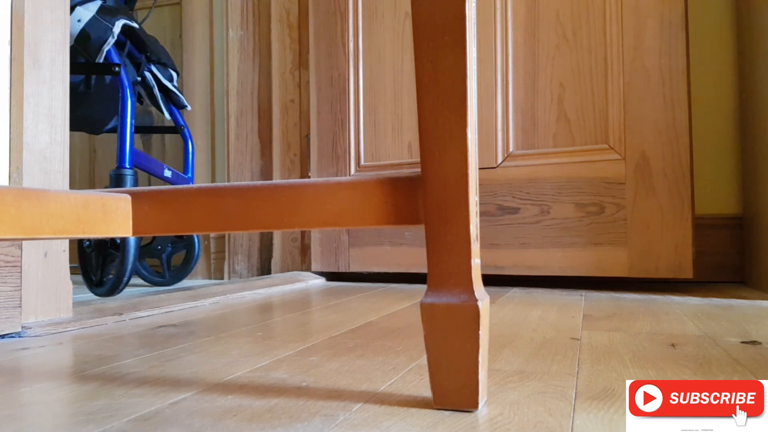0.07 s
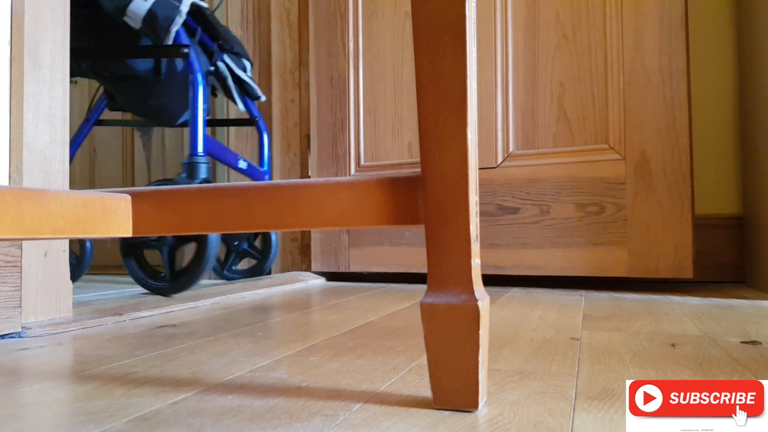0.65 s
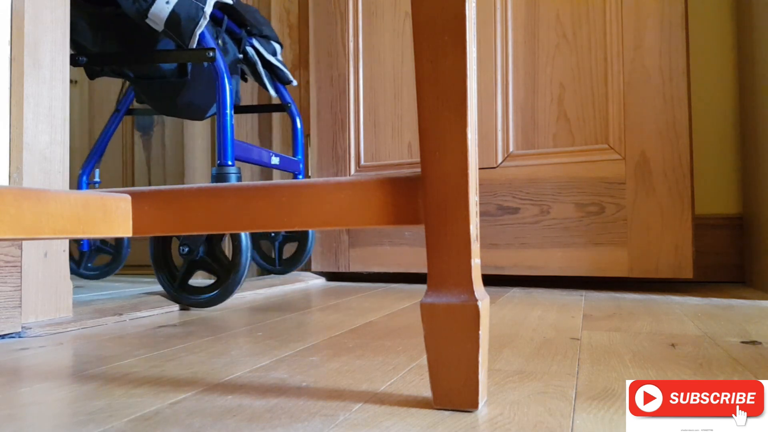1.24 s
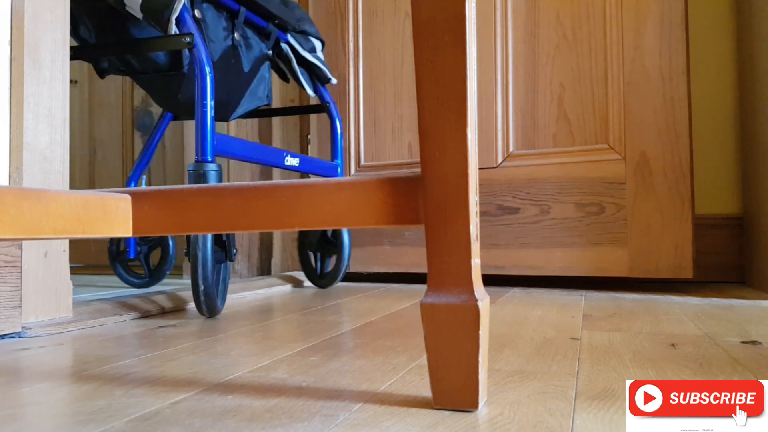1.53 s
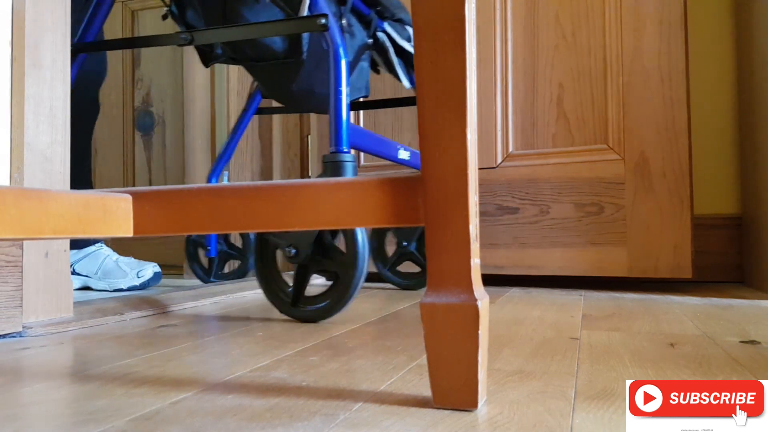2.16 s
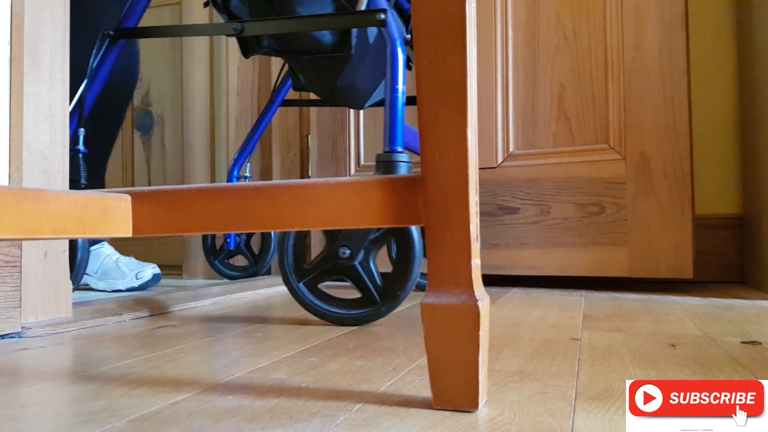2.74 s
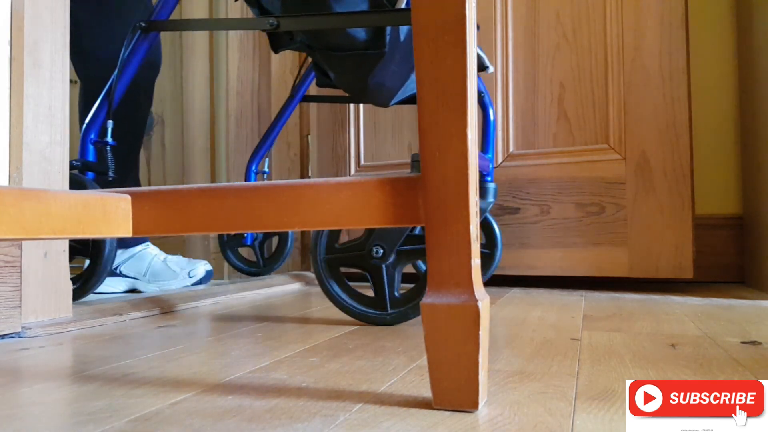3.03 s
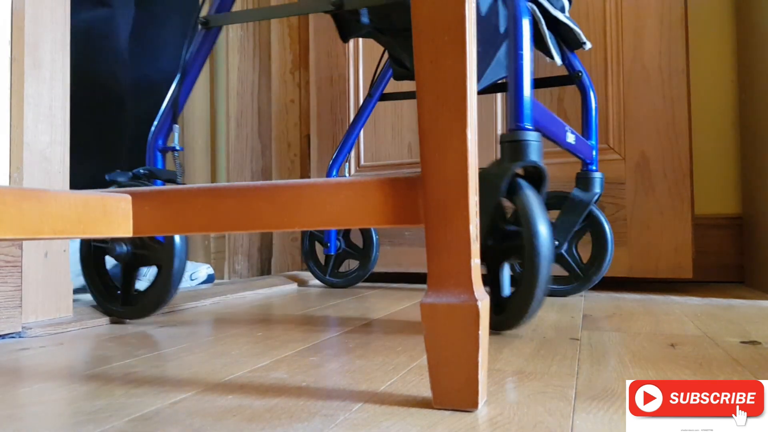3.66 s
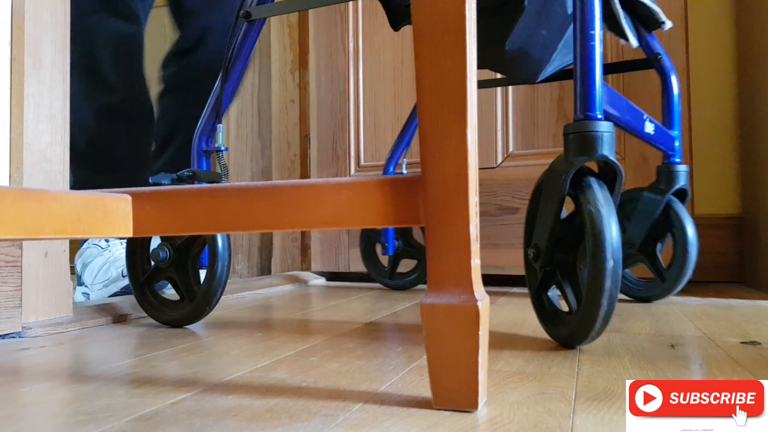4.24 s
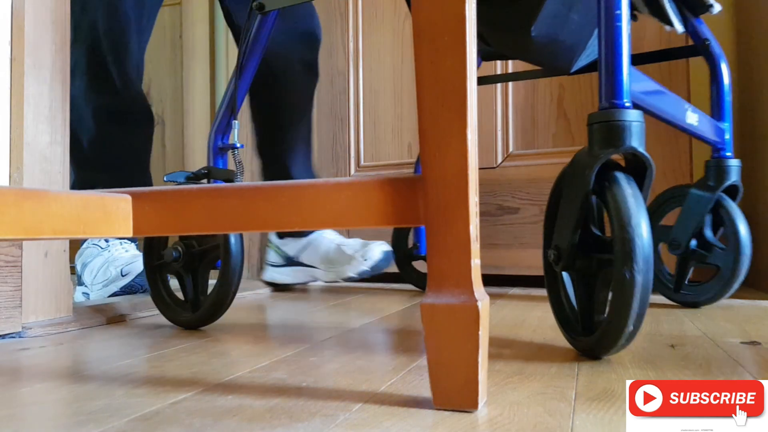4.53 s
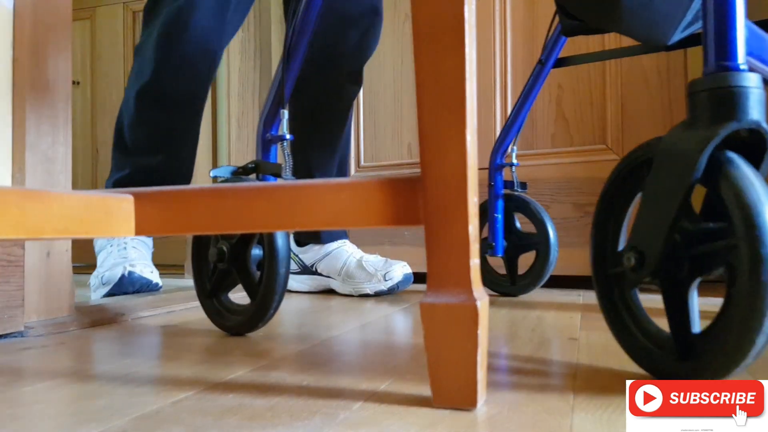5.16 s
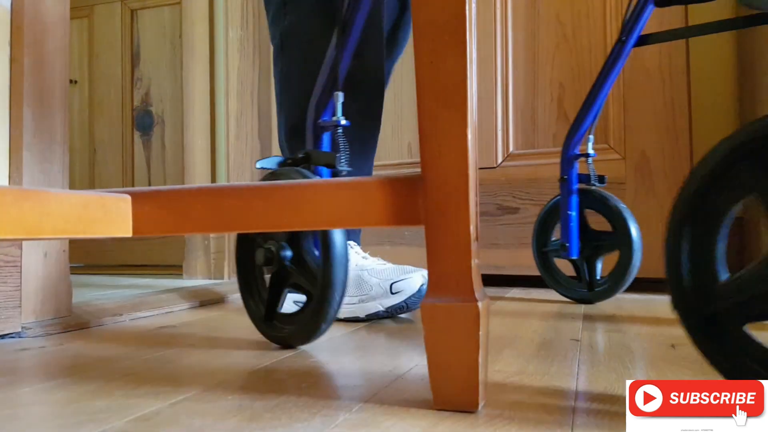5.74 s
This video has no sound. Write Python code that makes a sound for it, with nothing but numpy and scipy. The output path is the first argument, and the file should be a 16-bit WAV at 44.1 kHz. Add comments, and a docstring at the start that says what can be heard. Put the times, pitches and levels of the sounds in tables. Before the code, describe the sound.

A wheeled walker is pushed over a door sill and along a wooden floor in a small room. First comes a cluster of thuds and clacks, with loose casters and metal tubes rattling. Separate bumps follow, then another burst of clatter and softer knocks from wheels and footsteps. Underneath, the tyres rumble softly with each push, and soles and trousers brush faintly. The sound is close, with a short room echo.

```python
"""Thuds, clacks and rattles of a wheeled walker pushed over a door sill and along a wooden floor.
Wheels and shoes bump the boards; the loose casters and the tube frame clatter and ring.
A wheel whines faintly, soles and trousers brush, and the tyres rumble softly with each push,
all in a small wooden room."""
import sys
import numpy as np
from scipy import signal
from scipy.fft import rfft, irfft
from scipy.io import wavfile
from scipy.ndimage import uniform_filter1d

SR = 44100
rng = np.random.default_rng(int(sys.argv[2]) if len(sys.argv) > 2 else 0)


def digitize_waveform(pressure):
    """Quantize a signal to 16-bit integers and store it at the path in sys.argv[1].

    Rows of a 2-D input are taken as channels; values are limited to [-1, 1].
    """
    field = np.atleast_2d(pressure).T
    bounded = np.clip(field, -1, 1)
    quanta = np.round(bounded * 32767).astype(np.int16)
    wavfile.write(sys.argv[1], SR, quanta)


N = 255760
RING_SAMPLES = 18432
AGE_S = np.arange(RING_SAMPLES) / SR

# Boards and the space under them. Each row: frequency in Hz, level in dB.
BOARD_MODES = [(60, -11), (83, -0.5), (103, -3), (125, -11), (146, -5), (178, -9.5), (205, -2.5), (242, -1),
               (275, -3), (305, -2.5), (342, -2.5), (380, -7), (422, -5.5), (452, -0.5), (495, -20),
               (585, -8)]
# Frame tubes, damped by hands, bag and tyres. Each row: frequency in Hz, level in dB.
TUBE_MODES = [(779, -5), (1120, 0), (1356, -8), (1614, -7), (1705, 2), (2203, -10.5), (2512, -2.5),
              (2657, 3), (2896, -6.5), (3162, -1.5), (3510, -11), (4050, -4), (4660, -0.5)]


def walker(tube_t60_s=0.21, graze_db=-23, graze_lead_s=0.0044):
    """A bump shakes boards and frame, then the casters rebound; rattles and ticks skip the boards."""
    # Wheels and shoes landing. Each row: time in seconds, thud in dB, stiffness of the spot 0-1,
    # caster clack in dB, frame looseness 0-1.
    bumps = [(0.354, -38, 0.1, -38, 1), (0.379, -48.5, 0.77, -33, 0.5), (0.678, -28.5, 0.49, -27, 0.42),
             (0.806, -28.5, 0.5, -26, 0.9), (0.955, -49, 0.56, -43.5, 0.82), (1.38, -46, 0.69, -46, 0.74),
             (1.424, -45.5, .5, -37, 0.55), (1.4901, -21.5, 0.87, -22, 0.62), (1.962, -47, 0.68, -55, 0.4),
             (2.125, -42.5, 0, -55, 0.4), (2.2355, -23, 0.01, -29, 0.11), (2.556, -53, 0.22, -51.5, 0.48),
             (2.693, -44, 0.6, -40.5, 0), (3.4941, -29.5, 0.96, -26.5, 0.28),
             (3.736, -31, 0.4, -25.5, 0.87), (3.767, -28, 0.78, -29, 0.33), (3.84, -45.5, 1, -40.5, 0),
             (4.358, -57.5, 0.38, -48, 0.31), (4.521, -37.5, 0.34, -52, .1),
             (4.647, -32.5, 0.22, -37.5, 0.38), (5.583, -43, 0.69, -46, .25), (5.716, -41.5, 0.6, -51, 0.4)]
    # Casters falling back. Each row: delay in seconds, dB relative to the bump's clack.
    rebounds = [(.113, -29), (.15, -34)]
    # Play in casters, brakes and hinges. Each row: time in seconds, clack in dB,
    # tilt in dB per octave, frame looseness 0-1.
    rattles = [(0.466, -47.5, 1.5, 0.5), (0.572, -52.5, 9, 0.42), (0.697, -37.5, -0.5, .7),
               (0.778, -33, 5, 0.83), (0.856, -29.5, 6, .7), (0.97, -44, 5, .5), (1.468, -36.5, -1.5, .25),
               (1.537, -34, 1.5, 0.57), (1.935, -56.5, -3, 0.3), (1.994, -44.5, 5, 0.16),
               (2.044, -51.5, 4, .35), (2.067, -44.5, -7, 0.48), (2.084, -47.5, 2.5, .55),
               (2.265, -39.5, 12, 1.0), (3.371, -38, 1.5, 0.73), (3.804, -39.5, 6, 0.6),
               (4.995, -52, 18.5, 0.58), (5.3, -42, 3, 0.39), (5.756, -44, 15, 0.33),
               (5.795, -44.5, -2, .15)]
    # Bright ticks of fittings and a shoe. Each row: time in seconds, level in dB.
    ticks = [(0.68, -51), (0.805, -28), (1.492, -43), (2.038, -57), (2.264, -37.5), (3.736, -45),
             (3.785, -55)]
    # Board decay. Each row: frequency in Hz, T60 in seconds.
    board_t60 = [(80, .25), (200, .28), (330, .24), (600, .19)]
    # Spectra of a joint snap and a bright tick, including the microphone's 9 kHz lift.
    # Each row: frequency in Hz, gain in dB.
    snap_spectrum = [(1200, -32.5), (2200, -5), (2800, 4.5), (3500, -1), (4200, 0.5), (5000, -5),
                     (5900, -17.5), (8000, -44), (15000, -49.5)]
    tick_spectrum = [(2500, -24.5), (4200, -16), (5600, -3.5), (7000, -2), (8000, 0.5), (9100, 5),
                     (10500, -1), (13000, -5.5), (15800, -10)]
    floor, frame = np.zeros((2, 2, N))
    boards = modes([(hz, db, lookup(board_t60, hz)) for hz, db in BOARD_MODES])
    tubes = modes([(hz, db, tube_t60_s) for hz, db in TUBE_MODES])
    snap_filter, tick_filter = colour(snap_spectrum), colour(tick_spectrum)
    parts = snap_filter, tick_filter, tubes
    spots = [room() for _ in range(12)]  # echoes vary along the floor
    for k, (s, thud_db, stiffness, clack_db, looseness) in enumerate(bumps):
        echoes = spots[k % len(spots)]
        add(floor, s, gain_of(thud_db) * board_bump(stiffness, boards, echoes))
        add(frame, s, clatter(clack_db, parts, echoes, looseness, tilt_db_oct=lerp(-2, 5, looseness)))
        for delay_s, drop_db in rebounds:
            rebound = clatter(clack_db + drop_db, parts, echoes, looseness=0.43, tilt_db_oct=3.5)
            add(frame, s + delay_s, rebound)
    for k, (s, clack_db, tilt_db_oct, looseness) in enumerate(rattles):
        add(frame, s, clatter(clack_db, parts, spots[-k % len(spots)], looseness, tilt_db_oct))
    for (s, db), echoes in zip(ticks, spots):
        add(frame, s, gain_of(db) * bright_tick(tick_filter, echoes))
    # Loose parts graze just before they meet: a faint early copy, sides swapped.
    lead = int(graze_lead_s * SR)
    graze = gain_of(graze_db) * np.pad(frame[::-1, lead:], ((0, 0), (0, lead)))
    return floor + frame + graze


def board_bump(stiffness, boards, echoes):
    """Springy spots between joists thud; stiff spots answer higher and knock more. Slightly left."""
    thud_hz, knock_hz = lerp(107.7, 184, stiffness), lerp(337, 375.7, stiffness)
    knock_db = lerp(-8.5, 6.5, stiffness)
    thud = unit_rms(flex(thud_hz, boards, echoes, cycles=0.9, ring_db=3, wet_db=-5.5), size=1764)
    knock = unit_rms(flex(knock_hz, boards, echoes, cycles=0.84, ring_db=-6, wet_db=-12.5), size=1100)
    return lean_left(thud, db=0.73) + gain_of(knock_db) * lean_left(knock, db=2)


def flex(hz, boards, echoes, cycles, ring_db, wet_db, reach_oct=0.74, scatter_db=4):
    """A blow swings the wood for a few cycles and wakes the board modes near its pitch."""
    turns = hz * AGE_S
    swing = -np.sin(2 * np.pi * turns) * (turns / cycles * np.exp(1 - turns / cycles)) ** 2
    octaves = np.log2(np.transpose(BOARD_MODES)[0] / hz)
    weights = np.exp(-(octaves / reach_oct) ** 2 / 2)
    weights *= gain_of(scatter_db * rng.standard_normal(len(BOARD_MODES)))
    phases = np.exp(2j * np.pi * rng.random(len(BOARD_MODES)))
    ring = (weights * phases @ boards).real * (1 - np.exp(-(turns / 2) ** 2))
    ring *= np.linalg.norm(swing) / np.linalg.norm(ring)
    return swing + gain_of(ring_db) * ring + gain_of(wet_db) * convolve(swing, echoes)


def clatter(clack_db, parts, echoes, looseness, tilt_db_oct, tubes_db=-11.5):
    """Wheel clacks, joint snaps, fitting ticks, tubes ring; slack adds snap, tick and longer chatter."""
    # Plastic wheel spectrum. Each row: frequency in Hz, gain in dB.
    wheel_spectrum = [(100, -42.5), (300, 5), (520, 4.5), (720, 6), (920, -1), (1300, 2), (1800, -2),
                      (2400, -7.5), (3100, -25), (6000, -66.5)]
    snap_filter, tick_filter, tubes = parts
    snap_db = clack_db + lerp(-25.5, 1.5, looseness)
    tick_db = clack_db + lerp(-33, -23, looseness)
    wheel = colour([(hz, db + tilt_db_oct * np.clip(np.log2(hz / 1300), -1, 1))
                    for hz, db in wheel_spectrum])
    clack = chatter(wheel, echoes, contact_s=lerp(0.002, 0.004, looseness), wet_db=-4)
    snap = chatter(snap_filter, echoes, contact_s=lerp(0.002, 0.0055, looseness), wet_db=-1)
    tick = bright_tick(tick_filter, echoes)
    # The clack drives the low tube modes, the snap the high ones.
    drive_db = np.interp(np.transpose(TUBE_MODES)[0], [2000, 3000], [clack_db, snap_db])
    phases = np.exp(2j * np.pi * rng.random((2, len(TUBE_MODES))))
    ring = (gain_of(drive_db + tubes_db) * phases @ tubes).real
    return gain_of(clack_db) * clack + gain_of(snap_db) * snap + gain_of(tick_db) * tick + ring


def bright_tick(tick_filter, echoes):
    """Brief treble burst of a fitting or shoe."""
    return chatter(tick_filter, echoes, contact_s=0.005, wet_db=0.83)


def chatter(body, echoes, contact_s, wet_db):
    """Loose parts touch many times in milliseconds; the body colours the burst, the room prolongs it."""
    age = AGE_S[:2048] / contact_s
    contacts = grains(2048, spread_db=0.5) * np.sqrt(age) * np.exp(-age)
    burst = signal.fftconvolve(contacts, body[None], axes=1)
    tail = convolve(echoes, body)
    sound = gain_of(wet_db) * tail / np.linalg.norm(tail)
    add(sound, 0, burst / np.linalg.norm(burst))
    return unit_rms(sound, size=882)


def tyres(coast_tau_s=0.12, lumps_db=3.5):
    """Tyres drum on uneven grain and hiss on fine dust; each push speeds up, then coasts."""
    # Each row: start, end and ramp time in seconds, full-speed rumble and grit in dB.
    pushes = [(0.355, 0.876, 0.23, -57, -64), (1.228, 1.704, 0.094, -58.5, -73.5),
              (1.853, 2.185, 0.14, -48.5, -64.5), (3.007, 5.08, 0.15, -56.5, -74.5),
              (5.242, 5.81, 0.81, -53, -71)]
    # Rolling spectra. Each row: frequency in Hz, gain in dB.
    rumble_spectrum = [(25, -30), (55, -1), (100, 3.5), (180, 0), (330, -1.5), (480, -13.5), (650, -12),
                       (900, -38), (2000, -49)]
    grit_spectrum = [(400, -9.5), (800, -8.5), (1200, 5.5), (1800, -3), (3000, -10.5), (4800, -17),
                     (6500, -26.5), (15000, -38.5)]
    t = np.arange(N) / SR
    rumble_gain, grit_gain = np.zeros((2, N))
    for start_s, end_s, ramp_s, rumble_db, grit_db in pushes:
        speed = np.clip((t - start_s) / ramp_s, 0, 1) * np.exp(-np.maximum(t - end_s, 0) / coast_tau_s)
        rumble_gain += gain_of(rumble_db) * speed
        grit_gain += gain_of(grit_db) * speed
    lumps = unit_rms(uniform_filter1d(uniform_filter1d(rng.standard_normal(N), size=900), size=400))
    rumble = rumble_gain * unit_rms(convolve(diffuse(N), colour(rumble_spectrum, size=8192)))
    grit = grit_gain * unit_rms(convolve(diffuse(N), colour(grit_spectrum)))
    return (rumble + grit) * gain_of(lumps_db * lumps)


def brushes(wet_db=3):
    """Each slide of sole or cloth is a soft swell of friction grains."""
    # Each row: start in seconds, length in seconds, level in dB.
    slides = [(0, 0.046, -63.5), (1.288, .09, -60.5), (1.656, 0.12, -63), (2.076, 0.099, -60),
              (2.559, 0.046, -52.5), (2.65, .15, -65), (2.782, .06, -61.5), (3.036, 0.043, -62.5),
              (4.305, 0.13, -64.5), (4.396, 0.023, -53.5), (4.517, 0.034, -48), (4.848, 0.35, -69),
              (5.586, 0.074, -55.5)]
    # Spectrum of a soft scuff, including the microphone's 7 kHz dip and 9 kHz lift.
    # Each row: frequency in Hz, gain in dB.
    scuff_spectrum = [(300, 4), (1500, -0.5), (3000, -9), (5000, -11.5), (7200, -15.5), (9200, -4),
                      (11500, -8), (15800, -16)]
    out = np.zeros((2, N))
    for start_s, length_s, db in slides:
        size = int(length_s * SR)
        scuff = unit_rms(convolve(grains(size, spread_db=2.5), colour(scuff_spectrum)))
        add(out, start_s, gain_of(db) * scuff * np.sqrt(np.hanning(size)))
    return out + gain_of(wet_db) * convolve(out, room())


def sinking_tones(width_hz=280, pitch_sag=0.094, wet_db=1):
    """Short sinking tones of narrowband noise: a frame ping, a faint wheel whine and a shoe scuff."""
    # Each row: start in seconds, length in seconds, starting pitch in Hz, level in dB.
    tones = [(0.132, .05, 1523, -63.5), (.135, .05, 2717, -69), (4.012, 0.38, 1240, -75),
             (4.351, 0.051, 1780, -58)]
    out = np.zeros((2, N))
    pole = np.exp(-np.pi * width_hz / SR)
    for start_s, length_s, hz, db in tones:
        size = int(length_s * SR)
        noise = rng.standard_normal((2, size)) + 1j * rng.standard_normal((2, size))
        flutter = signal.lfilter([1], [1, -2 * pole, pole * pole], noise)
        glide_hz = np.linspace(hz, hz * (1 - pitch_sag), size)
        tone = (flutter * np.exp(2j * np.pi * np.cumsum(glide_hz) / SR)).real
        add(out, start_s, gain_of(db) * unit_rms(tone) * signal.windows.tukey(size, 0.3))
    return out + gain_of(wet_db) * convolve(out, room())


def room(build_s=0.0015):
    """Impulse response: dense echoes build quickly and die band by band."""
    # Room decay. Each row: frequency in Hz, T60 in seconds.
    room_t60 = [(80, 0.57), (300, .28), (700, 0.23), (1800, 0.21), (4500, 0.27), (9000, 0.24), (15000, 0.1)]
    hz, t, bands = signal.stft(diffuse(RING_SAMPLES), SR, nperseg=256)
    decay = gain_of(-60 * t / lookup(room_t60, hz)[:, None])
    tail = signal.istft(bands * decay, SR, nperseg=256)[1][:, :RING_SAMPLES]
    tail *= 1 - np.exp(-AGE_S / build_s)
    return tail / np.linalg.norm(tail[0])


def hush(level_db=-69):
    """Still air of the house and microphone hiss."""
    # Each row: frequency in Hz, gain in dB.
    hush_spectrum = [(20, -12), (50, -3), (105, 3.5), (200, -10.5), (450, -14), (900, -23), (2000, -20),
                     (4000, -22.5), (7000, -25.5), (9200, -23), (12000, -19), (15800, -27.5)]
    return gain_of(level_db) * unit_rms(convolve(diffuse(N), colour(hush_spectrum, size=8192)))


def diffuse(size):
    """Noise from all sides: left and right alike in the bass, unrelated in the treble."""
    # Each row: frequency in Hz, left-right correlation 0-1.
    correlation = [(100, 0.95), (300, 0.88), (600, 0.44), (1200, 0.17), (2500, 0.039), (15000, 0.0099)]
    a, b = rfft(rng.standard_normal((2, size)))
    alike = lookup(correlation, np.fft.rfftfreq(size, 1 / SR))
    mid, side = a * np.sqrt((1 + alike) / 2), b * np.sqrt((1 - alike) / 2)
    return irfft(np.array([mid + side, mid - side]), size)


def grains(size, spread_db):
    """Noise in which a few tiny contacts stand out."""
    return diffuse(size) * gain_of(spread_db * np.minimum(rng.exponential(1, size), 5))


def modes(table):
    """One decaying complex tone per row."""
    hz, db, t60_s = np.transpose(table)[:, :, None]
    return gain_of(db - 60 * AGE_S / t60_s) * np.exp(2j * np.pi * hz * AGE_S)


def colour(spectrum, size=2048):
    """Minimum-phase impulse response with the given spectrum."""
    log_gain = np.log(gain_of(lookup(spectrum, abs(np.fft.fftfreq(size, 1 / SR)))))
    return np.fft.ifft(np.exp(signal.hilbert(log_gain).conj())).real


def lookup(table, hz):
    """Interpolates on a log-frequency axis."""
    table_hz, values = np.transpose(table)
    return np.interp(np.log(hz + 1), np.log(table_hz + 1), values)


def convolve(x, response):
    """Convolves, keeping the length of x."""
    return signal.fftconvolve(np.atleast_2d(x), np.atleast_2d(response), axes=1)[:, :x.shape[-1]]


def add(mix, start_s, sound):
    """Mixes in a stereo sound."""
    part = mix[:, round(start_s * SR):][:, :sound.shape[1]]
    part += sound[:, :part.shape[1]]


def lean_left(x, db):
    """Left up, right down by db."""
    return x * gain_of([[db], [-db]])


def unit_rms(x, size=None):
    """Scales to rms 1 over the first size samples."""
    return x / np.sqrt(np.mean(x[..., :size] ** 2) + 1e-20)


def gain_of(db):
    """Decibels to amplitude."""
    return 10 ** (np.asarray(db) / 20)


def lerp(a, b, share):
    """Linear blend from a to b."""
    return a + share * (b - a)


def scene():
    """Walker, feet and room together."""
    return walker() + sinking_tones() + brushes() + tyres() + hush()


def record(dry):
    """Low-pass at 15850 Hz."""
    lowpass = signal.firwin(511, 15850, window=("kaiser", 9), fs=SR)
    return signal.oaconvolve(dry, lowpass[None], "same")


dry = scene()
out = record(dry)
digitize_waveform(out)
```